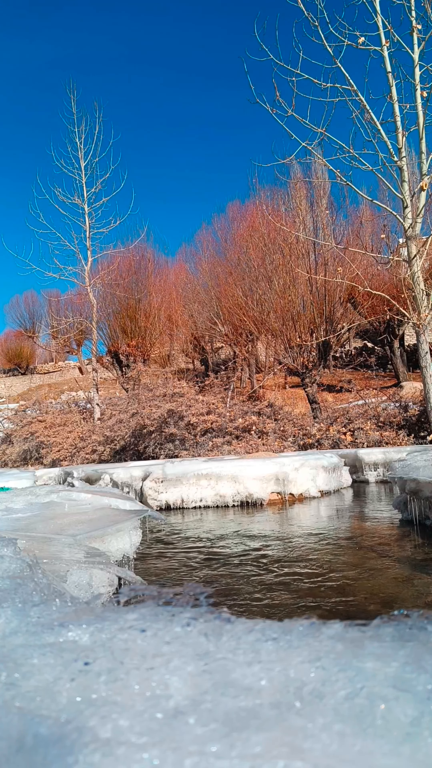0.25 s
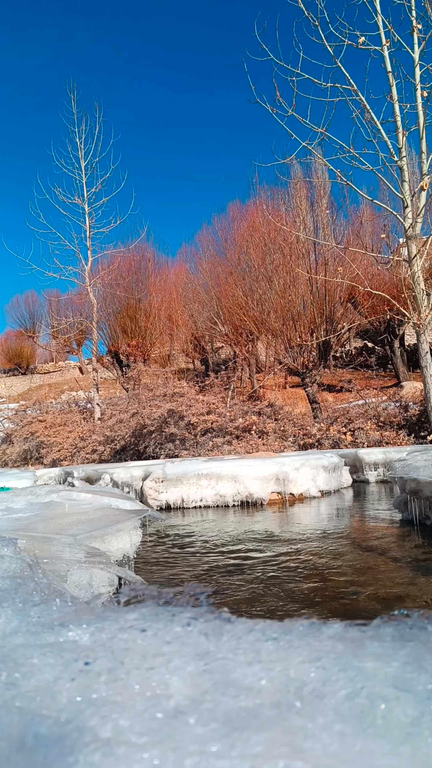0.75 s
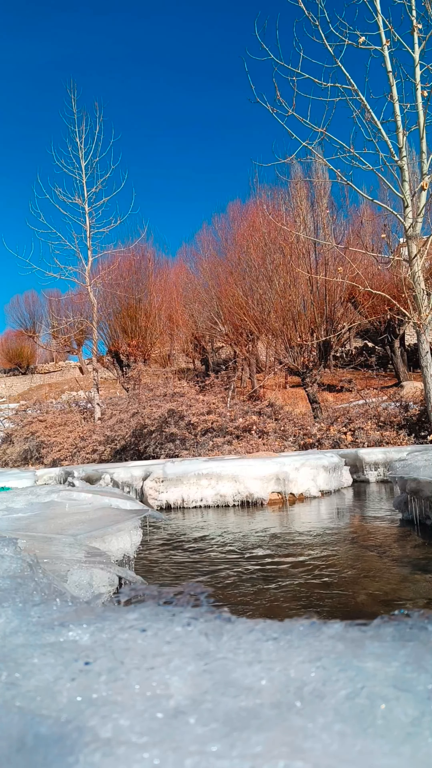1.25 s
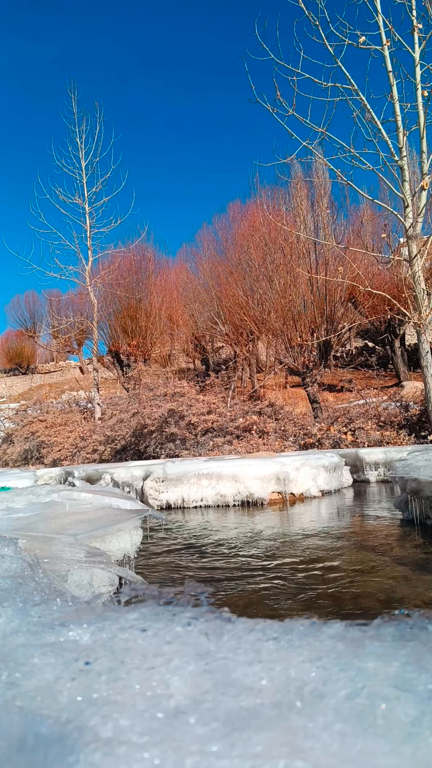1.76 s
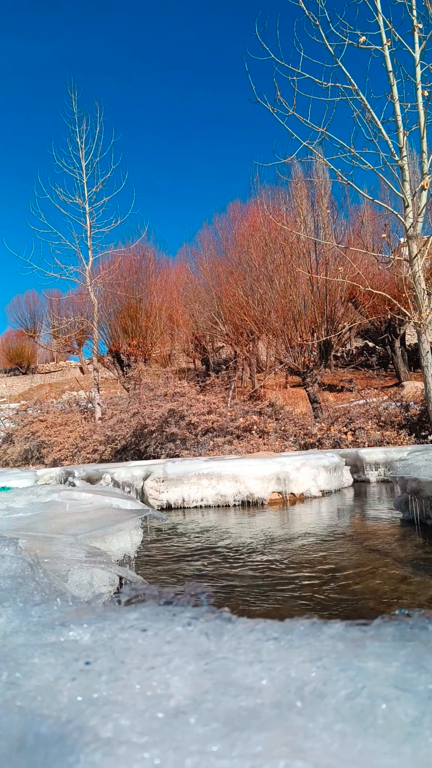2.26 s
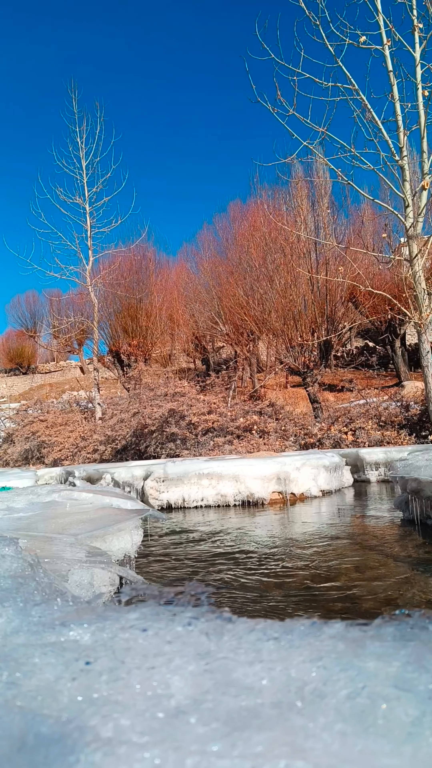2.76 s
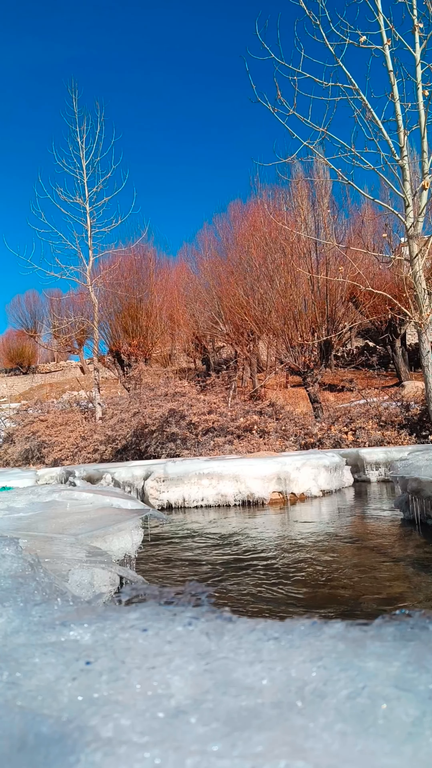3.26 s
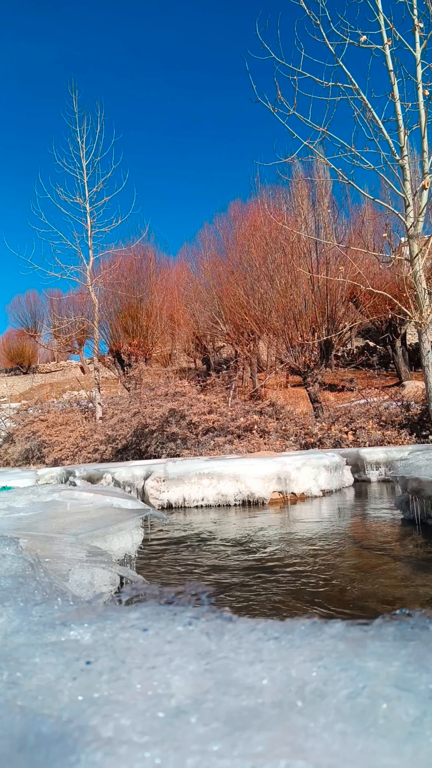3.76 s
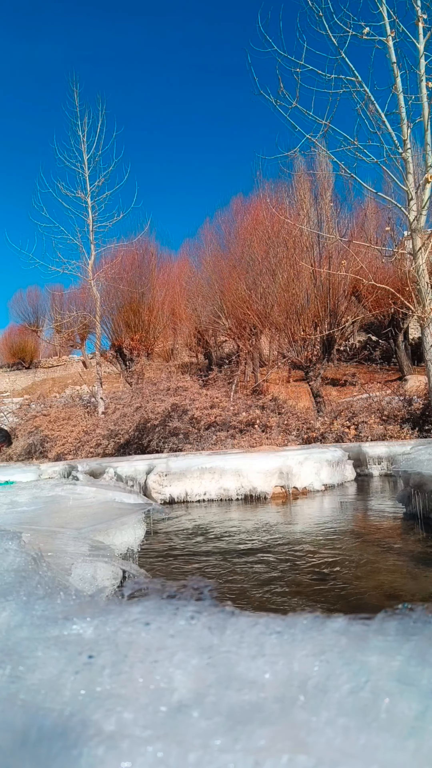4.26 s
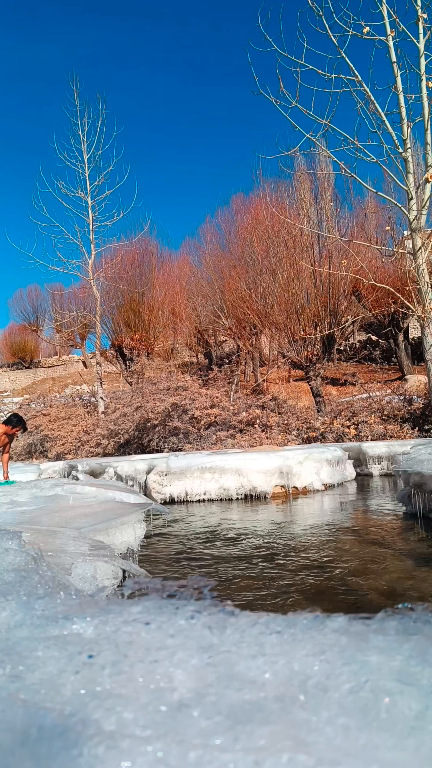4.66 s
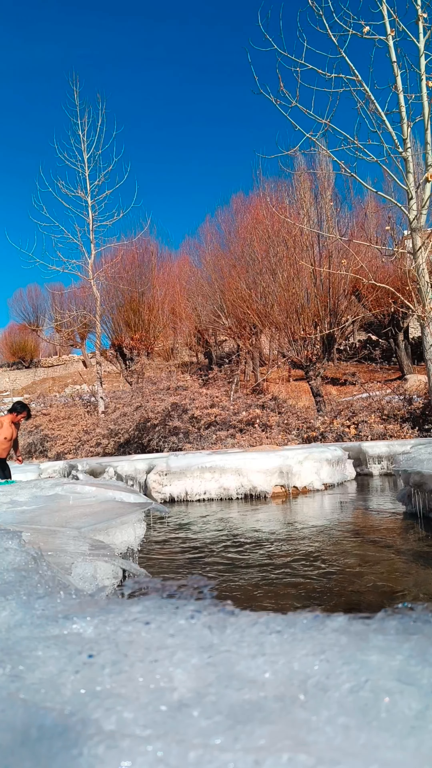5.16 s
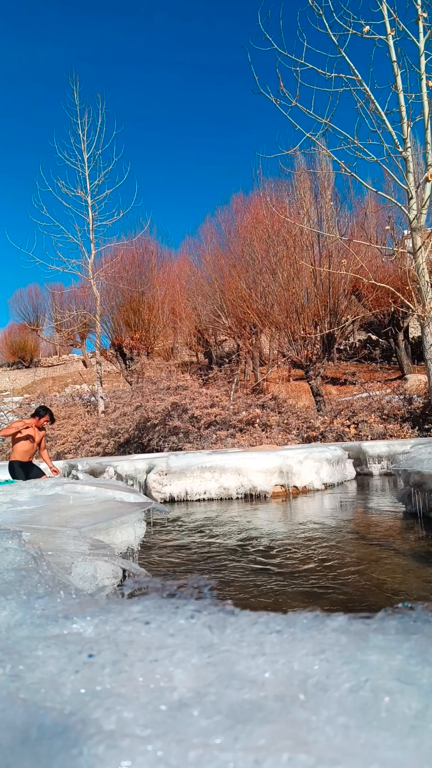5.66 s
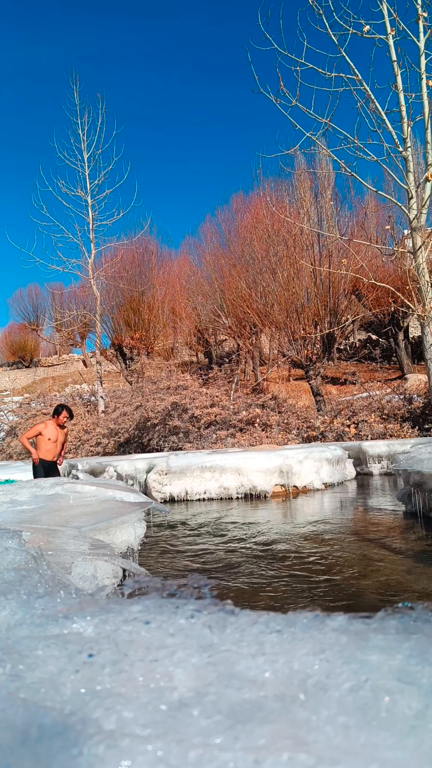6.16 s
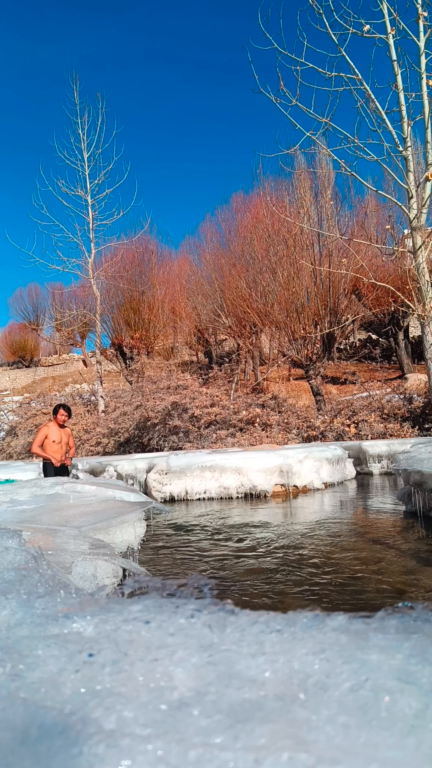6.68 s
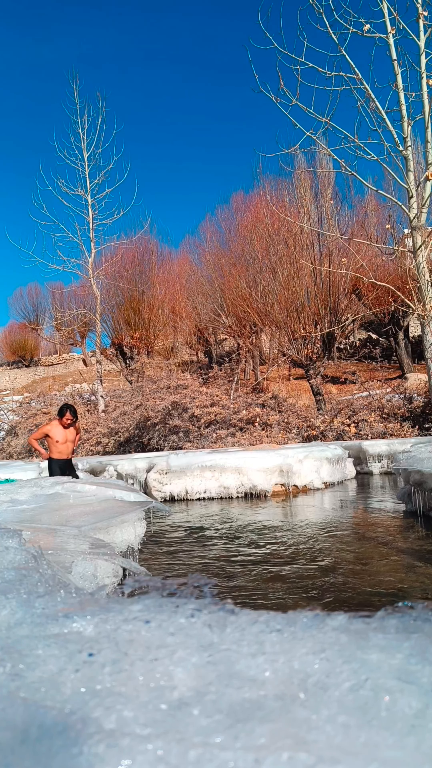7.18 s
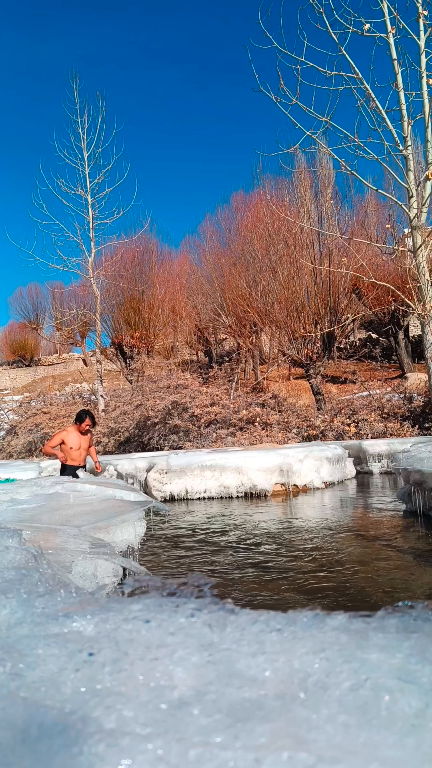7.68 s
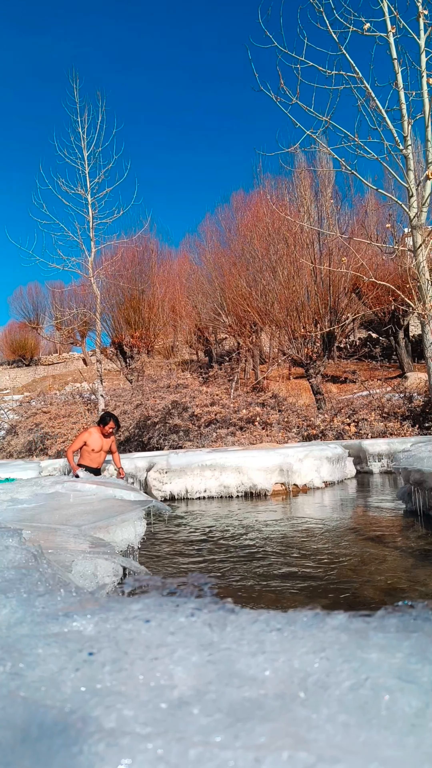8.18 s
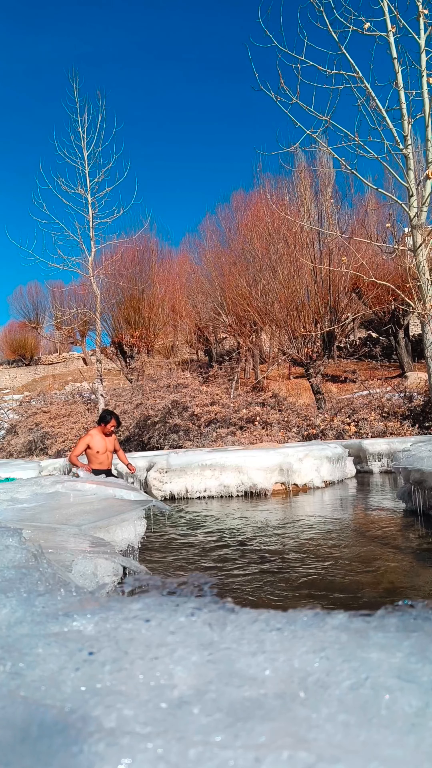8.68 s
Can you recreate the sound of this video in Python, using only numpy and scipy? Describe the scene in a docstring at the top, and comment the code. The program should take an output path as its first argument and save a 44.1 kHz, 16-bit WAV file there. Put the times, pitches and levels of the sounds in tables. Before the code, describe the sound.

Close stream water babbles outdoors, gurgling low under an ice shelf with scattered little pops and ticks of spray.

```python
"""An open channel in the ice, outdoors, with a shallow stream running close to the microphone.
Countless bubbles merge into a soft rush, and the current gurgles in hollows under the ice shelf.
Nearer by, single bubbles pop and fine spray ticks on the open water. Once, a bright hiss swells
and the stream dips briefly. Light air rumbles on the microphone underneath it all."""
import sys
import numpy as np
from scipy import signal
from scipy.fft import rfft, irfft, next_fast_len
from scipy.io import wavfile
from scipy.ndimage import uniform_filter1d

SR = 44100
rng = np.random.default_rng(int(sys.argv[2]) if len(sys.argv) > 2 else 0)


def transcribe(signal):
    """Save signal, clipped to [-1, 1], as a 16-bit WAV file at the path in sys.argv[1]."""
    frames = np.atleast_2d(signal).T
    limited = np.clip(frames, -1, 1)
    pcm = np.round(limited * 32767).astype(np.int16)
    wavfile.write(sys.argv[1], SR, pcm)


N = 393813


def rush(babble_db):
    """Mid-sized bubbles babble on top of the blur of all the farther ones."""
    # tone of the merged bubbles: (frequency [Hz], relative level [dB])
    spectrum = [(120, -16), (250, -0.5), (380, -1), (470, -4.5), (600, 1), (740, -3.5), (1000, -2),
                (1300, -4.5), (1650, -9.5), (2100, -12.5), (2700, -22.5), (3600, -50), (7000, -33),
                (16000, -65)]
    babble = swarm(low_hz=384.7, high_hz=2970, cycles=30, spread_db=1.5, rise=0.17, count=4500)
    water = rng.standard_normal((2, N)) + from_db(babble_db) * babble
    return widened(water, from_db(per_bin(spectrum) + channel_db()))


def gurgle(churn_db, side_db):
    """Eddies knock on the air pockets under the ice; each booms at its own pitch."""
    # air pockets: (pitch [Hz], bandwidth [Hz], relative level [dB])
    hollows = [(54.8, 28, -2), (86.1, 15.6, 1), (120.5, 30, -6), (152, 29.9, 2), (174.8, 50, -6.5),
               (209.3, 68, -2.5), (303.3, 51, -10.5)]
    out = 0
    for hz, width_hz, level_db in hollows:
        mid_knocks = grains(per_s=2000, spread_db=churn_db)
        side_knocks = from_db(side_db) * grains(per_s=2000, spread_db=churn_db)
        edges_hz = hz * np.exp(np.array([-.5, .5]) * width_hz / hz)
        mid, side = filtered([mid_knocks, side_knocks], edges_hz, "band")
        boom = evened(np.array([mid + side, mid - side]), span_s=0.61)
        out = out + from_db(level_db + gulps_db(hz)) * np.sqrt(width_hz) * boom
    return rms_one(out) * panned(-0.5)


def gulps_db(pocket_hz, reach_hz=45):
    """Each gulp is a smooth swell and fall of the air pockets near its pitch."""
    # gulps under the ice: (time [s], length [s], pitch [Hz], swell [dB])
    gulps = [(.62, 0.11, 88, 8.5), (2.24, .06, 155, 4.5), (2.58, .07, 85, 8), (3.3, .15, 185, 4),
             (3.63, .08, 85, 8), (5.207, .08, 160, 5), (5.962, 0.42, 150, 4), (6.85, 0.077, 156, 6),
             (7.307, .14, 150, 6), (7.86, 0.063, 165, 6), (8.533, 0.053, 170, 6)]
    t = np.arange(0, N, 100) / SR
    swell_db = sum(db * np.exp(-(2 * (t - s) / length_s) ** 2 - ((pocket_hz - hz) / reach_hz) ** 2)
                   for s, length_s, hz, db in gulps)
    return np.interp(np.arange(N) / SR, t, swell_db)


def pops(splash_db, scatter_db):
    """Close bubbles ring and spit, each followed by a brief scatter off the ice edges."""
    # the clearest bubbles: (time [s], pitch [Hz], level [dB], left over right [dB])
    close_bubbles = [(.426, 2870, -40, 13), (.465, 7800, -31, 7), (.525, 4250, -43, -7),
                     (.617, 4950, -40, 5), (1.679, 3905, -43, 0), (1.998, 2020, -34.5, -1),
                     (2.246, 3030, -34, 6), (2.2465, 2070, -25.5, 3), (3.497, 4250, -43, -8),
                     (4.325, 11255, -41, 10), (4.554, 960, -28.5, 0), (4.741, 796, -28, 2),
                     (5.421, 814, -23.5, -2), (5.424, 4480, -41, 0), (6.442, 1838, -35, -7),
                     (6.461, 10795, -38, 10), (6.945, 566, -30, -1), (7.132, 4940, -35, 8),
                     (7.133, 8613, -36, 10), (7.270, 5600, -39, 6), (7.309, 924, -25, 0),
                     (7.340, 4100, -41, -9), (7.643, 3880, -41, -4), (7.655, 2700, -40, 9),
                     (7.986, 13000, -29, -28)]
    out = np.zeros((2, N))
    for s, hz, level_db, pan_db in close_bubbles:
        khz = hz / 1000
        ring_s = 0.042 / khz ** 0.7   # smaller bubbles ring less and spit more
        spit_db = splash_db + 1.5 * np.log2(khz)
        gain = from_db(level_db) * panned(pan_db)
        add(out, s, gain * bubble(hz, ring_s, rise=0.023))
        add(out, s, gain * from_db(spit_db) * splash(hz, swell_s=0.0016))
    age = np.arange(SR // 20) / SR
    reflections = rng.standard_normal((2, len(age))) * np.exp(-age / .007)
    scatter = signal.fftconvolve(out, rms_one(reflections) / np.sqrt(len(age)), axes=1)[:, :N]
    return out + from_db(scatter_db) * scatter


def fizz(bubbles_db, spray_db, lapping_db):
    """Tiny bubbles and ticks of spray come in little waves as the ripples break."""
    # tone of the smallest bubbles: (frequency [Hz], relative level [dB])
    spectrum = [(1000, -7), (2000, -13.5), (2900, 1.5), (3500, -0.5), (4500, -3), (5800, -1), (10000, -2.5),
                (13000, -6), (16000, -9.5)]
    tiny = swarm(low_hz=2540, high_hz=12100, cycles=94, spread_db=3, rise=0.021, count=5000)
    drops = np.array([grains(per_s=110, spread_db=2) for _ in range(2)]) ** 2
    # each drop swells into a crackle of a few milliseconds
    pole = np.exp(-1 / (0.001 * SR))
    crackle = signal.lfilter([1], np.poly([pole, pole]), drops + 1e-18)
    spray = np.sqrt(np.abs(crackle)) * rng.standard_normal((2, N))
    water = rng.standard_normal((2, N)) + from_db(bubbles_db) * tiny + from_db(spray_db) * rms_one(spray)
    lapping = from_db(lapping_db * drift(14))
    return widened(water * lapping, from_db(per_bin(spectrum) + channel_db()))


def drips(per_s, low_hz, high_hz, level_db):
    """Faint droplets land at random, mostly on the left, and spit without ringing."""
    out = np.zeros((2, N))
    for when, size, strength, place in rng.random((int(per_s * N / SR), 4)):
        hz = low_hz * (high_hz / low_hz) ** size
        drip_db = level_db + 3 * (2 * strength - 1.5)
        pan_db = 5 + 11 * (2 * place - 1)
        add(out, when * N / SR, from_db(drip_db) * panned(pan_db) * splash(hz, swell_s=0.0015))
    return out


def hiss(low_hz, at_s, peak_db, rise_db_per_s, fall_db_per_s):
    """A soft, bright hiss swells and fades once."""
    bright = filtered(rng.standard_normal((2, N)), low_hz, "high")
    age = np.arange(N) / SR - at_s
    return from_db(peak_db + np.minimum(rise_db_per_s * age, -fall_db_per_s * age)) * rms_one(bright)


def breeze(level_db, gust_db):
    """Light air rumbles on each microphone port, more on the left."""
    air = filtered(rng.standard_normal((2, N)), [20, 46], "band")
    return from_db(level_db + gust_db * drift(4.7)) * rms_one(air) * panned(4.3)


def bubble(hz, t60, rise):
    """A bubble rings and dies, its pitch rising as it nears the surface."""
    age = np.arange(int(t60 * SR) + 2) / SR
    return np.sin(2 * np.pi * hz * age * (1 + rise * age / t60)) * np.exp(-np.log(1000) * age / t60)


def swarm(low_hz, high_hz, cycles, spread_db, rise, count):
    """Two unrelated crowds of bubbles of random size and strength, with a level spectrum; rms 1."""
    out = np.zeros((2, N))
    for k, (when, size, damping, strength) in enumerate(rng.random((count, 4))):
        hz = low_hz * (high_hz / low_hz) ** size
        gain = hz * from_db(-spread_db * np.log(strength + 1 / 50))
        ring_s = cycles * (.5 + damping) / hz
        add(out[k % 2][None], when * N / SR, gain * bubble(hz, ring_s, rise))
    return rms_one(out)


def splash(hz, swell_s):
    """The film of a bubble tears: a soft spit of noise around its pitch."""
    age = np.arange(SR // 30) / SR / swell_s
    band = signal.butter(1, [hz * .75, min(hz * 1.35, 18000)], "band", fs=SR, output="sos")
    spit = signal.sosfilt(np.vstack([band, band]), rng.standard_normal(len(age)))
    return rms_one(spit) * age * np.exp(1 - age)


def grains(per_s, spread_db):
    """Clicks at random times: many small ones, a few large."""
    sizes = from_db(spread_db * np.minimum(rng.exponential(1, N), 4))
    return (rng.random(N) < per_s / SR) * sizes * rng.choice([-1, 1], N)


def channel_db():
    """The boost that the ice banks give to each frequency."""
    # resonances between the banks: (frequency [Hz], bandwidth [Hz], boost [dB])
    resonances = [(544, 124, 1.5), (845, 150, 5), (1056, 100, 1.5), (3950, 120, 3.5)]
    return sum(db / (1 + (2 * (bin_hz() - hz) / width_hz) ** 2) for hz, width_hz, db in resonances)


def dip(at_s, fall_s, hold_s, recover_s, low_db):
    """A fader move: the level sinks, holds and recovers."""
    corners_s = np.cumsum([at_s, fall_s, hold_s, recover_s])
    return from_db(np.interp(np.arange(N) / SR, corners_s, [0, low_db, low_db, 0]))


def widened(pair, gain):
    """Two unrelated sounds become coloured stereo, narrow in the bass and wide in the treble; rms 1."""
    # likeness of left and right: (frequency [Hz], correlation [0-1])
    likeness = [(200, 0.86), (400, 0.89), (620, .95), (850, 0.87), (1250, 0.82), (1800, 0.52), (2100, 0.72),
                (2700, 0.069), (3050, 0.57), (3900, 0.33), (4500, 0.32), (5300, .22), (8000, .18),
                (15000, .04)]
    # the microphone body makes one side louder: (frequency [Hz], left over right [dB])
    balance = [(200, -2.5), (320, -4.5), (450, -0.4), (800, -1.5), (1300, -0.1), (2100, -0.1), (2800, 3),
               (3900, -1), (5000, -0.5), (7300, 1.2), (9500, 2.5), (13000, -2.2), (16000, -1.5)]
    # it also lets one side hear sooner: (frequency [Hz], left phase lead [rad])
    lead = [(250, 0.29), (350, -0.35), (470, -0.046), (820, -0.38), (1100, -0.46), (1650, -0.11),
            (2050, 1.55), (2550, 0.38), (3000, 0.69), (3900, 0.085), (4480, 1.4), (13000, 1.3)]
    alike = per_bin(likeness)
    mid, side = shaped(pair, gain * np.sqrt([1 + alike, 1 - alike]))
    lean = from_db(per_bin(balance) / 2) * np.exp(1j * per_bin(lead) / 2)
    return rms_one(shaped(np.array([mid + side, mid - side]), np.array([lean, 1 / lean])))


def evened(x, span_s):
    """Hold a stereo sound at rms 1, keeping only its flutter within span_s."""
    return x / np.sqrt(uniform_filter1d(np.mean(x ** 2, axis=0), int(span_s * SR)))


def drift(rate_hz):
    """A smooth random wander, mostly slower than rate_hz; rms 1."""
    return rms_one(shaped(rng.standard_normal(N), 1 / (1 + (bin_hz() / rate_hz) ** 2)))


def panned(pan_db):
    """Constant-power left and right gains; positive is left."""
    return rms_one(from_db([[pan_db / 2], [-pan_db / 2]]))


def filtered(x, edges_hz, kind):
    """A gentle pass filter."""
    return signal.sosfilt(signal.butter(2, edges_hz, kind, fs=SR, output="sos"), x)


def shaped(x, gain):
    """Equalise with a gain per FFT bin."""
    size = next_fast_len(N, real=True)
    return irfft(rfft(x, size) * gain, size)[..., :N]


def per_bin(points):
    """A curve over log frequency, read at every FFT bin."""
    hz, value = np.transpose(points)
    return np.interp(np.log(bin_hz() + 1), np.log(hz), value)


def bin_hz():
    """Frequencies of the FFT bins."""
    return np.fft.rfftfreq(next_fast_len(N, real=True), 1 / SR)


def add(out, s, sound):
    """Mix a sound in at time s."""
    start = int(np.clip(s * SR, 0, N - 1))
    out[:, start:start + sound.shape[-1]] += sound[..., :N - start]


def from_db(db):
    """Decibels to gain."""
    return 10 ** (np.asarray(db) / 20)


def rms_one(x):
    """Scale to rms 1."""
    return x / np.sqrt(np.mean(x ** 2) + 1e-20)


def scene():
    """Gurgle, rush and fizz form a bed that dips once; pops, drips, a hiss and light air lie on top."""
    low = from_db(-35) * gurgle(churn_db=1.56, side_db=-23.5)
    middle = from_db(-36.5 + 0.34 * drift(8)) * rush(babble_db=-13.5)
    high = from_db(-52) * fizz(bubbles_db=-11, spray_db=-6, lapping_db=0.5)
    bed = (low + middle + high) * dip(at_s=3.724, fall_s=0.2, hold_s=0.25, recover_s=0.48, low_db=-3)
    close = pops(splash_db=-18, scatter_db=-4)
    droplets = drips(per_s=7, low_hz=2980, high_hz=9000, level_db=-50.5)
    bright = hiss(low_hz=6500, at_s=3.585, peak_db=-42, rise_db_per_s=250, fall_db_per_s=125)
    return bed + close + droplets + bright + breeze(level_db=-51, gust_db=1.5)


def record(dry):
    """The microphone dulls the treble, and a steep high cut takes off the very top."""
    # microphone response: (frequency [Hz], gain [dB])
    response = [(5900, -0.5), (6600, -4), (7300, -9), (7900, -17), (8700, -15.5), (16000, -13.5)]
    cutoff_hz = 15700
    high_cut = 1 / np.sqrt(1 + (bin_hz() / cutoff_hz) ** 300)
    return shaped(dry, from_db(per_bin(response)) * high_cut)


dry = scene()
out = record(dry)
transcribe(out)
```